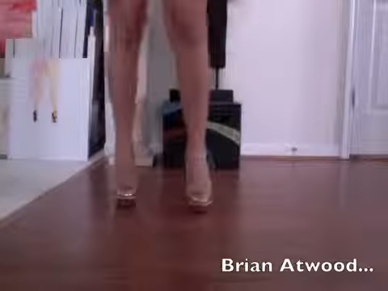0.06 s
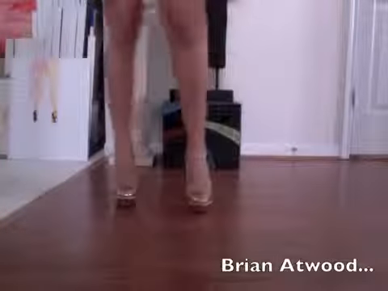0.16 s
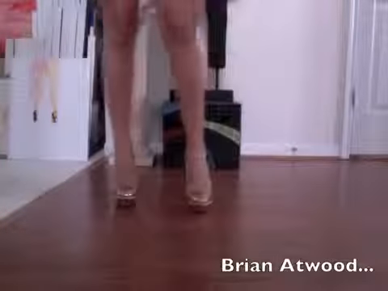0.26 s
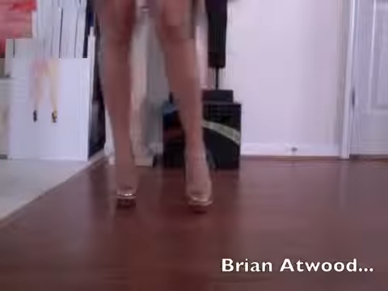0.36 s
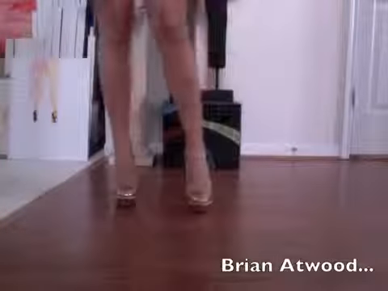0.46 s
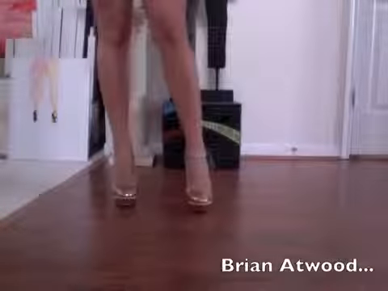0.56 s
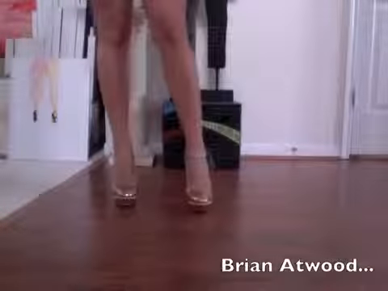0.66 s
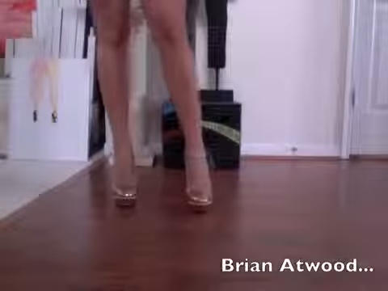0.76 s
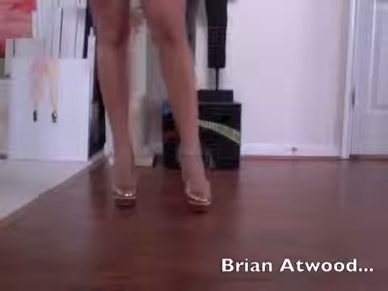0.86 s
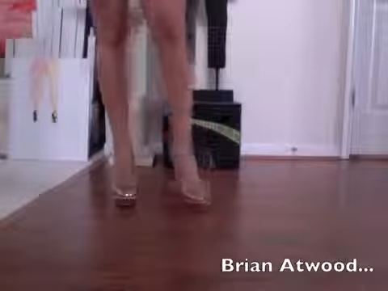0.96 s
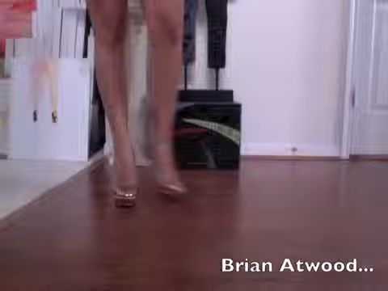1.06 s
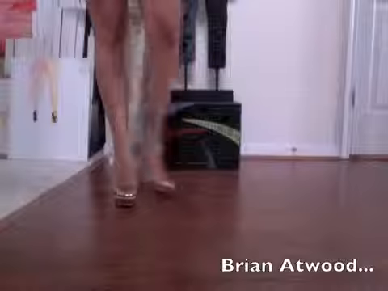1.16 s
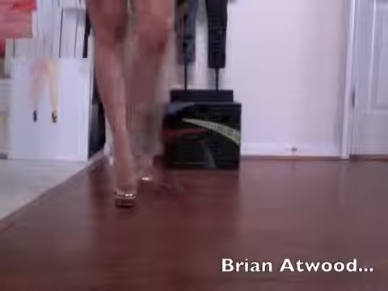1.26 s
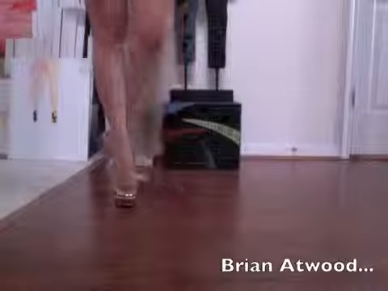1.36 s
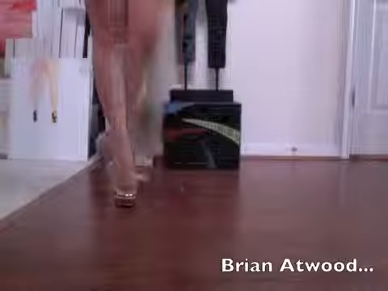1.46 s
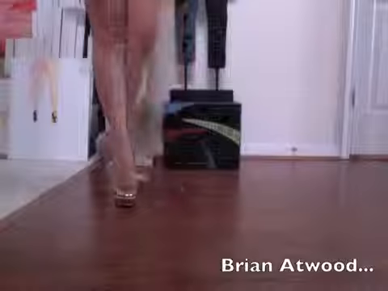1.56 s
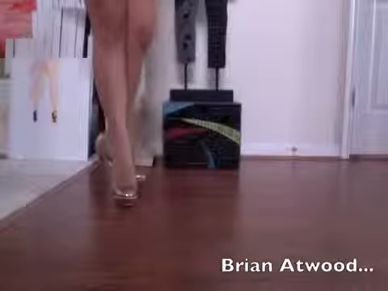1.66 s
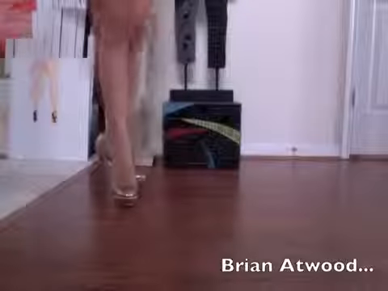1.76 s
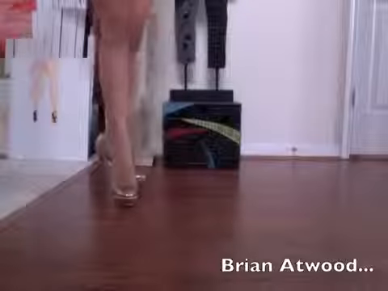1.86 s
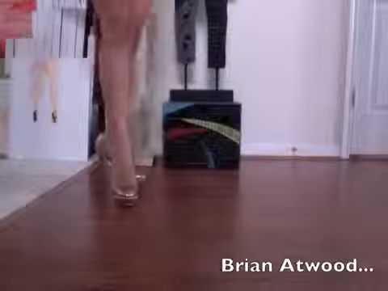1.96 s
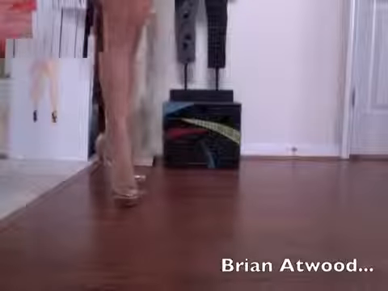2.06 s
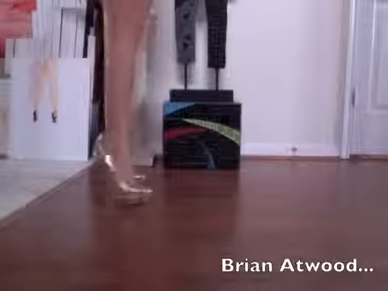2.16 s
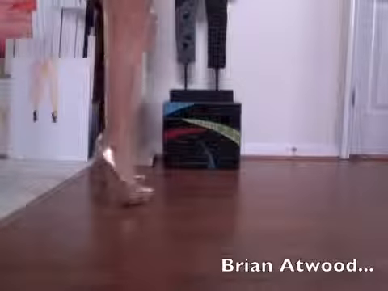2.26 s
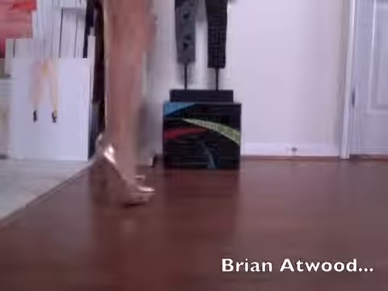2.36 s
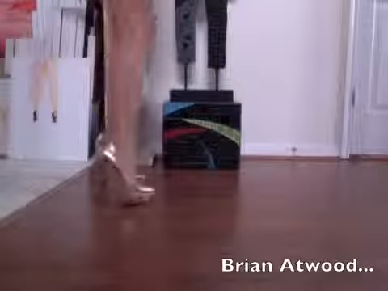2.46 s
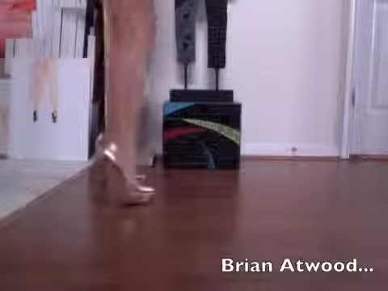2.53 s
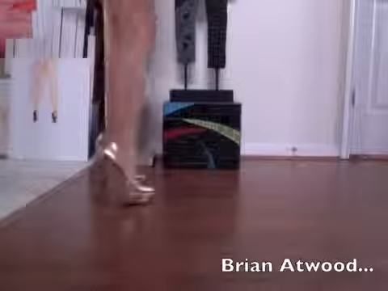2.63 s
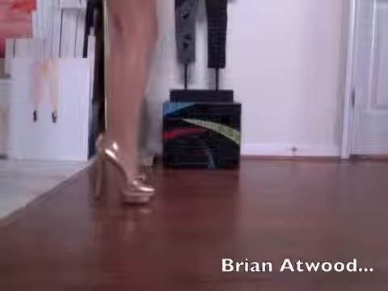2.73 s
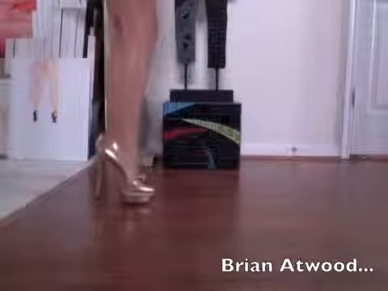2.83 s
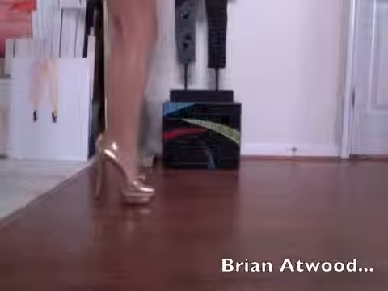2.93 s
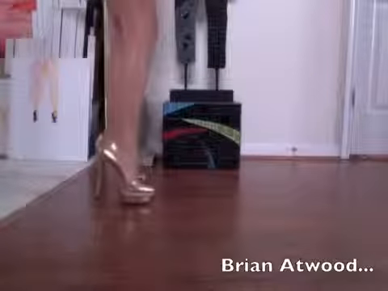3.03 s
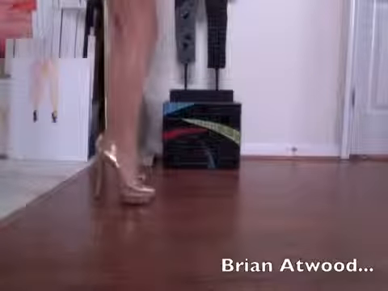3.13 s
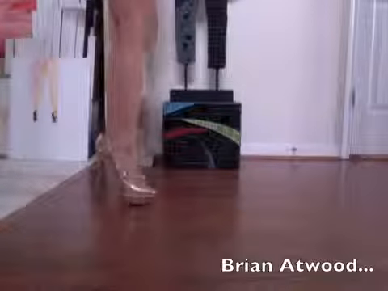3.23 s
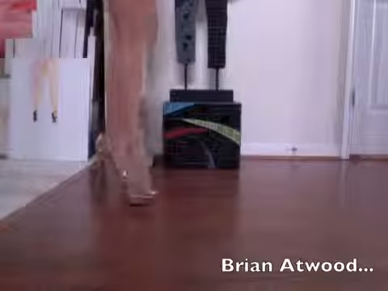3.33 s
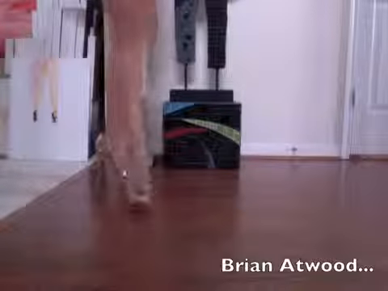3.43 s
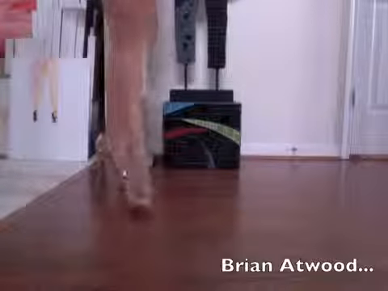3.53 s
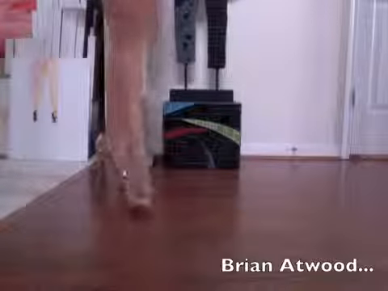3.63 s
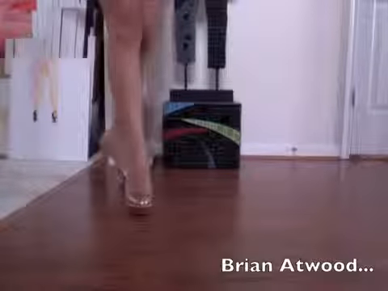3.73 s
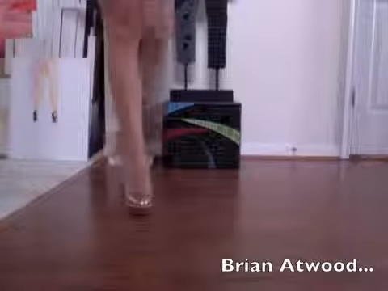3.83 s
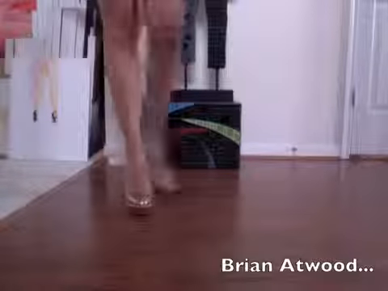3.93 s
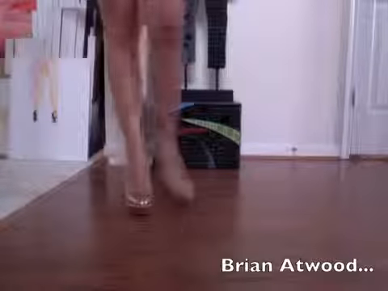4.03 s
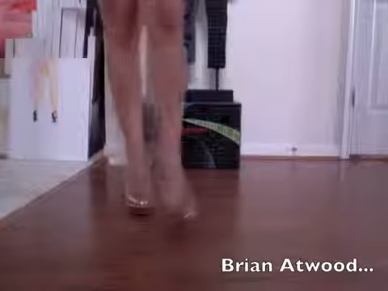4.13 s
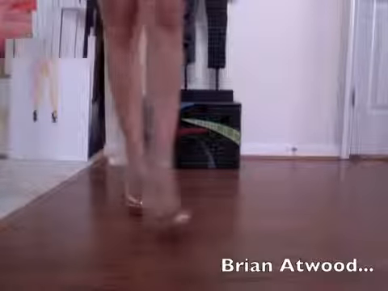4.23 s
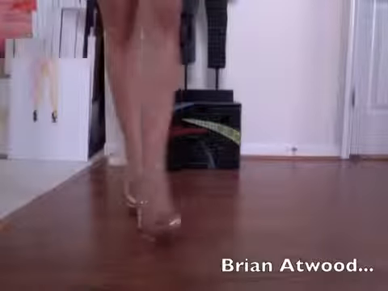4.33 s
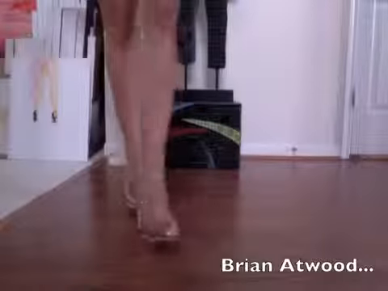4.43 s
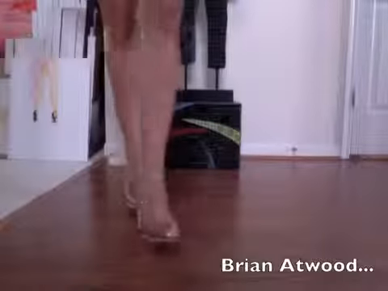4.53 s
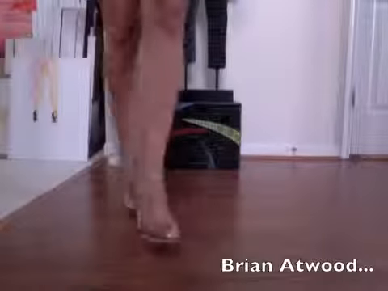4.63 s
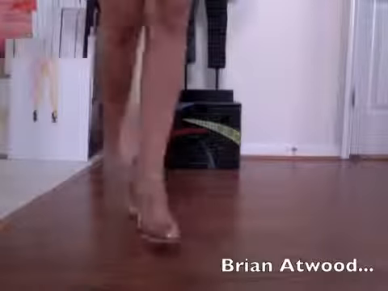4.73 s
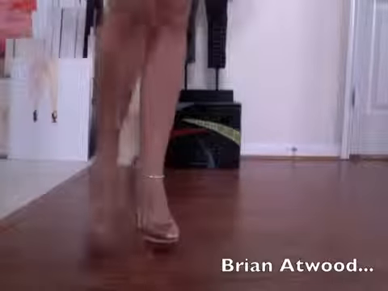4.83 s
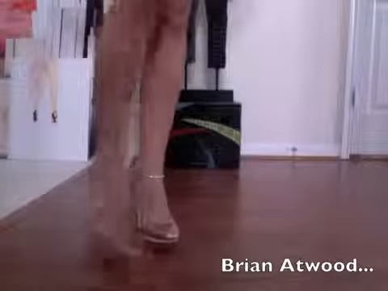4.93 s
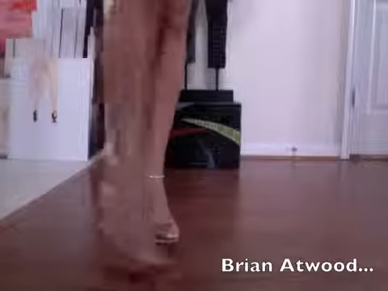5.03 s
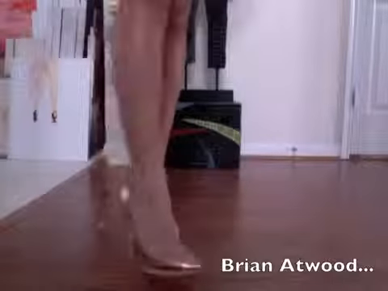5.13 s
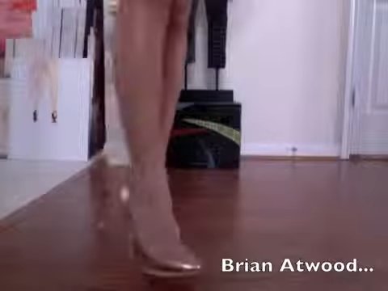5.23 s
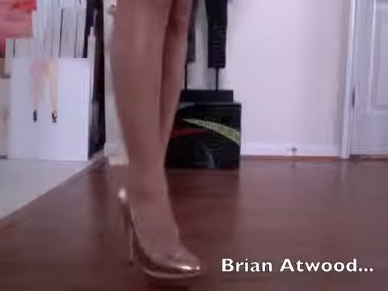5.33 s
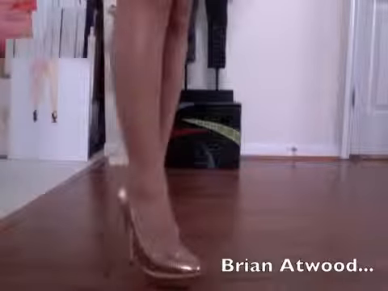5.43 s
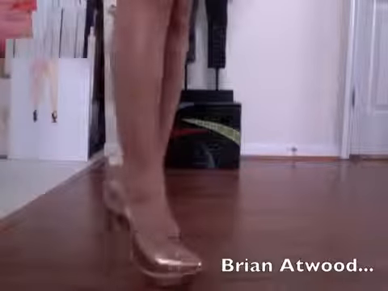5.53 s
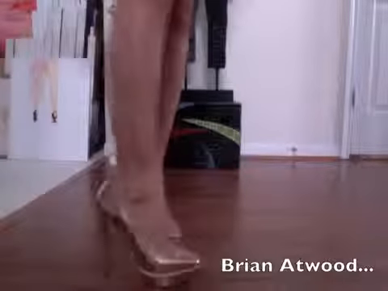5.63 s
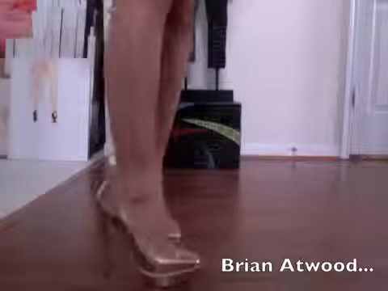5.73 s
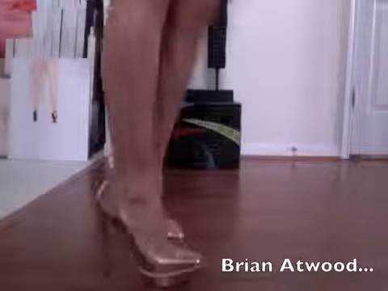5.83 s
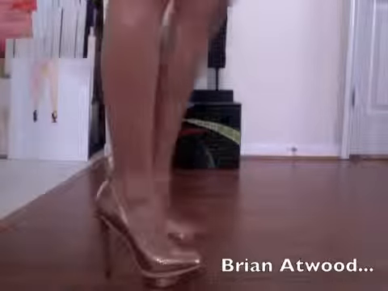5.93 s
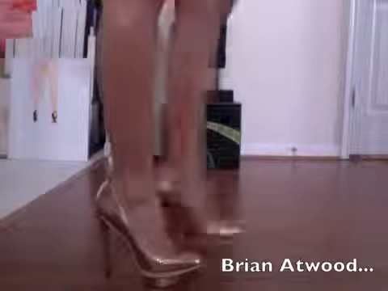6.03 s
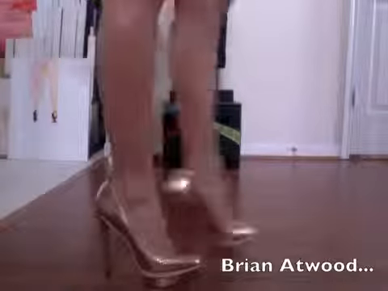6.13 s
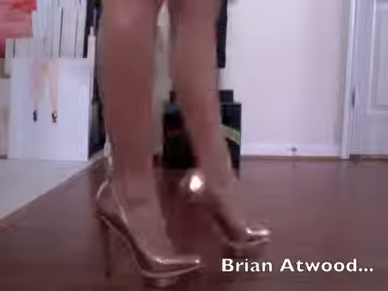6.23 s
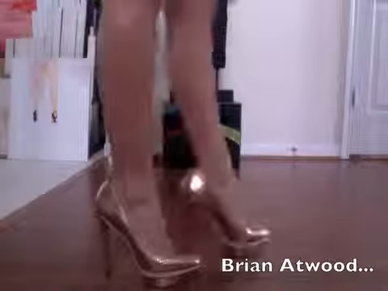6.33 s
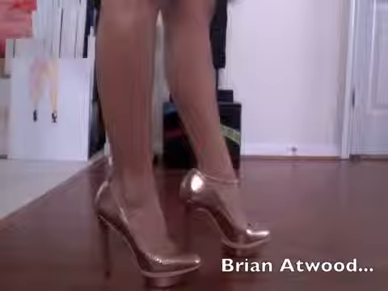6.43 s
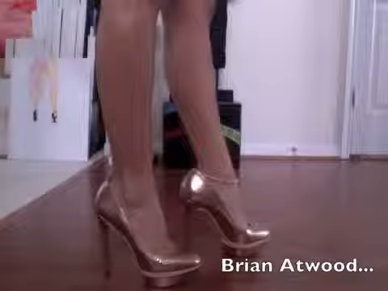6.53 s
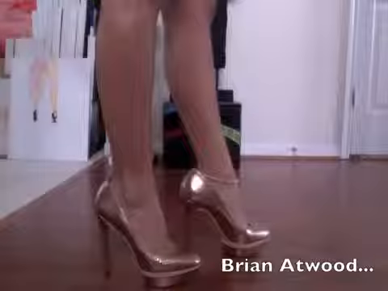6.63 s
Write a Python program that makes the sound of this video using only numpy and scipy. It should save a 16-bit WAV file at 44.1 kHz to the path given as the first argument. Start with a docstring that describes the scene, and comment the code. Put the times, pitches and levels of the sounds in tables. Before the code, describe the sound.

A small, hard indoor room heard near floor level, with little deep bass and a short lively reverberation. Faint air hiss, fan tones, mains hum and a tiny high tick run throughout. At 0 s a hollow platform-shoe knock hits wooden boards with a short scuff, then a click at 0.13. Light clicks and soft brushing come around 0.8-1.0. Knocks at 1.35 and 1.43 lead to a strong one at 1.49; scuffing and a knock at 1.7 follow, then a sharp bright snap at 1.94 and a gritty pivot until 2.2. Sparse small clicks and faint drags fill 2.3-3.4. A double knock lands at 3.47, with light clicks near 3.9-4.3. The loudest knock is at 4.31, another at 4.46, then a rapid juddering scrape until 4.65. Clicks at 4.9, knocks at 5.1-5.2, scuffs and a faint squeak around 5.5, a dull knock at 5.75, a clustered step at 6.2, and faint taps at 6.4.

```python
"""Platform heels on a wooden floor

Platform high heels step, turn and scuff on boards in a small hard room, heard from near the floor.
Knocks are pushes ringing soles and boards; clicks are noise bursts through the resonances of the shoe.
Drags are gritty noise, the judder is a row of slips, and squeaks are narrow bands of noise.
Walls, ceiling and a diffuse tail answer them; air noise, fan tones, mains hum and a faint tick run on.
"""
import sys
import numpy as np
from scipy import signal
from scipy.fft import rfft, irfft, next_fast_len
from scipy.io import wavfile
from scipy.ndimage import map_coordinates

SR = 44100
rng = np.random.default_rng(int(sys.argv[2]) if len(sys.argv) > 2 else 0)


def wav_out(sig):
    """Save sig, one row per channel (or a flat mono array), as 16-bit PCM at SR to the path in sys.argv[1]."""
    wavfile.write(sys.argv[1], SR, np.round(np.clip(np.atleast_2d(sig).T, -1, 1) * 32767).astype(np.int16))


def voltage_ratio(level):
    """Linear amplitude factor for a level in decibels (scalar or array-like)."""
    return 10 ** (np.asarray(level, float) / 20)


N = 294632

# room air, spectral shape only: pitch_hz, relative density_db (per Hz)
AIR_SHAPE = [(20, -48), (45, -50.5), (60, -39.5), (90, -17.5), (150, -14), (250, -18.5), (400, -17.5),
             (640, -21), (920, -12), (1250, -28.5), (1650, -18), (2600, -29.5), (7000, -38.5), (14900, -48)]
AIR_DB = -68  # rms
# fan tones: multiple of the shaft's speed, level_db (rms)
FAN_TONES = [(7, -90), (8, -68.5), (9, -82.5), (11, -78.5), (12, -82.5), (14, -82.5), (15, -85.5),
             (16, -77), (24, -89.5)]
SHAFT_HZ = 24.26
# mains hum: pitch_hz, level_db (rms)
MAINS_TONES = [(59.8, -92), (119.7, -70.5), (239.4, -76)]
TICK_START_S, TICK_GAP_S, TICK_ROUND_S = .1735, .0657, .5608  # first tick, spacing, repeat of a run of eight

# reverberation: pitch_hz, time to die by 60 dB t60_s
ROOM_DECAY = [(100, 0.48), (300, 0.38), (800, 0.44), (2000, 0.47), (5000, 0.39), (12000, 0.12)]
# first answers of near walls and furniture: lag_s, level_db
WALL_ECHOES = [(.0023, -11), (.0041, -14.5), (.0062, -14.5), (.0079, -12.5), (0.0083, -15.5), (0.015, -18),
               (0.0183, -22.5)]
WALL_TOP_HZ = 4360  # they swallow the treble above
# ceiling echo through the scene: start_s, lag_s
CEILING_LAG = [(0, .0125), (4.4, .0125), (5.2, .014), (6.0, .016)]
KNOCK_ECHO_DB, CLICK_ECHO_DB = -13, -6.5  # returns off the ceiling

# resonances of the shoe, for one pass of a filter used two or three times: pitch_hz, width_hz, level_db
SHOE_MODES = [(1848, 1240, -2.5), (4063, 1540, 1), (6380, 2620, -1), (10100, 2000, -1), (13200, 3300, -7.5)]
# resonances of the boards, before any narrowing by ring: pitch_hz, width_hz, level_db
BOARD_MODES = [(147.5, 104, 0), (242, 133, 4.5), (406, 135, -1), (572.6, 100, 4.5), (732, 185, 0),
               (972, 197, -0.5), (1585, 100, -5)]
SOLE_WIDTH = 1.2  # width of the sole's resonance as a multiple of its pitch, at ring 1

# thin squeaks of the shoe's leather: start_s, length_s, pitch_hz, level_db (rms before the fades)
SQUEAKS = [(0.963, 0.027, 13200, -69), (.975, 0.033, 5900, -70), (1.003, .015, 7250, -79),
           (2.064, 0.12, 4250, -66), (4.68, .07, 6260, -64), (5.504, 0.064, 5270, -70),
           (5.52, 0.087, 9420, -77.5), (5.523, 0.059, 11100, -82)]
# shoe clicks whose thin high echo comes back off the ceiling about 11 ms later:
# start_s, click level_db (peak), thin echo level_db (rms before the fades)
ECHOED_CLICKS = [(3.88, -57.5, -76), (3.903, -50.5, -77), (3.922, -48, -77), (4.0527, -44, -67),
                 (4.1056, -46, -70), (4.2098, -50, -71), (4.2648, -50, -78)]
ECHOED_LOW_DB, ECHOED_TREBLE_DB, ECHOED_MS = -3, -20.5, 5.9  # tone and 20 dB decay of the click
THIN_ECHO_LAG_S, THIN_ECHO_S, THIN_ECHO_HZ = .011, 0.0055, 13350

# soles brushing the floor: start_s, strongest_s, end_s, level_db (shoe body), treble_db (hiss over body)
SCUFFS = [(0, -0.003, 0.06, -52.5, -17), (0.142, 0.274, 0.43, -67.5, -19), (0.762, 0.785, 0.89, -69, -34),
          (.83, 0.886, 0.99, -67, -29), (0.951, 0.983, 1.17, -70, -7), (1.549, 1.697, 1.97, -63.5, -16),
          (2.292, 2.33, 2.65, -75.5, -12), (2.63, 2.645, 2.72, -82.5, 13), (3.118, 3.203, 3.24, -72.5, -16),
          (3.385, 3.43, 3.8, -74.5, -11), (3.593, 3.625, 3.86, -67, -23), (3.837, 3.898, 4.09, -71, -9),
          (4.039, 4.06, 4.6, -77.5, -4), (4.89, 4.903, 5.08, -63.5, -3), (5.174, 5.242, 5.27, -69, -9),
          (5.478, 5.581, 5.61, -62.5, -19), (5.64, 5.66, 5.86, -71.5, -20), (5.907, 5.927, 6.01, -77.5, -1)]
# start and end under the strongest moment; boards over the shoe; graininess
SCUFF_ENDS_DB, SCUFF_RUMBLE_DB, GRIT_DB = -15.5, 2.5, 3
# a sole pivoting under the full weight, one list of points a pivot:
# start_s, level_db (shoe body), treble_db (hiss over body), rumble_db (floor over body)
PIVOTS = [
    [(1.955, -65.5, 3.5, -6), (2.0, -63.5, -0.5, 5.5), (2.08, -62, -5, 0.5), (2.19, -62.5, -15, -4.5),
     (2.21, -77, -3, 5), (2.3, -81, -10, 8)],
    [(4.46, -63, -15, -14), (4.5, -61, -7.5, -3), (4.64, -55.5, -6.5, -3), (4.69, -59.5, -23, -1),
     (4.735, -56, -14, -4.5), (4.765, -78, -1, 4.5), (4.88, -71, -10, 4.5)],
]
# a sole judders as it twists under weight:
# start_s, end_s, slips a second, level_db (first slip, before scatter), base treble_db, floor knock_db over level
JUDDER = (4.4955, 4.645, 65.3, -40, -6, 3)
# clicks of the shoes: start_s, level_db (peak), low_db, treble_db, length_ms (to fall 20 dB)
CLICKS = [(0.127, -29.5, 8, -12, 6.6), (0.2912, -56, 34, -28, 3.8), (0.761, -40.5, -9, -72, 2.3),
          (0.7773, -46, -6, -52, 6.3), (0.7994, -42, -3, -56, 3.2), (0.8595, -44, -5, -65, 4.7),
          (0.881, -50, -9, -50, 3), (0.89, -48.5, -9, -51, 1.4), (1.4841, -36, 19.5, -22, 6.7),
          (1.5898, -66, -7, 0, 3), (1.6, -56, -4, 0, 2.4), (1.61, -63, -8, 3, 3),
          (1.6262, -51.5, 13, 11, 2.2), (1.6796, -54, -2, -23, 3.5), (1.701, -43.5, 14, -32, 4.1),
          (1.721, -51.5, -28, -24, 4.8), (1.7574, -48, -19, -19, 11), (1.8253, -53.5, 18, 7, 4.2),
          (1.8724, -52, 11, -2, 3.3), (1.924, -47.5, 8, -17, 4.2), (1.9335, -44, -15, 14, 4.5),
          (1.9439, -23.5, 1.5, -13, 8.7), (1.9491, -36, 7, -16, 7.3), (2.006, -44.5, 12, -15, 4),
          (2.0182, -40, -31, -2, 4), (2.0432, -40.5, -17, -3, 6.1), (2.117, -42, 1, -8, 8.8),
          (2.3147, -49, 8, 0, 5.1), (2.367, -45.5, 4, -10, 4.6), (2.624, -37, 4.5, -7, 5.9),
          (2.883, -55, -4, -22, 3.8), (2.8929, -44.5, 2, 2, 6.8), (3.466, -41, 1.5, -53, 10.4),
          (3.6266, -45, 19, -4, 4.4), (3.645, -48, 21, -3, 5), (4.3088, -36, -5, -67, 7.2),
          (4.7405, -47.5, -31, -9, 2.6), (4.8943, -35, 5.5, -15, 6.8), (4.9, -38.5, -3, -3, 3),
          (4.9373, -35.5, -1, -9, 3.7), (4.9541, -42, -3, -26, 4.7), (4.9644, -42, -12, -5, 2.1),
          (5.1107, -46.5, 3, -29, 10), (5.218, -54, 10, -16, 5.5), (5.445, -57.5, -3, -23, 3),
          (5.5987, -44, -6, -26, 7.1), (5.658, -48, -6, -36, 11), (5.7186, -52, 0, -18, 2.3),
          (5.7477, -52, 16, -25, 2.2), (6.0185, -47, -3.5, -2, 8.1), (6.208, -49, 9.5, -23, 10),
          (6.3868, -46.5, -1, 3, 4), (6.4397, -45.5, -3, 1, 2.8)]
# knocks on the boards: start_s, level_db (peak), pitch_hz of the striking sole,
# ring (1 = usual, larger rings longer), thump_db (joists over boards)
STEPS = [(0.001, -29, 640, 3.6, -41), (0.007, -21, 693, 4.7, -15), (0.02, -26, 554, 1.1, -29),
         (0.125, -38, 740, 1.8, -20), (0.791, -43, 450, 0.37, -30), (0.806, -43.5, 604, 3.4, -29),
         (1.347, -32, 438, 5.5, -5), (1.425, -30, 538, 6.5, -1), (1.485, -16.5, 630, 1.5, -18),
         (1.698, -29.5, 805, 1.3, -19), (1.946, -31, 1010, 3, -26), (2.006, -45, 676, 1.1, -16),
         (3.467, -23, 480, 1.3, -20), (3.474, -26.5, 500, 1.3, -8.5), (3.561, -34, 495, 2.9, -7),
         (3.586, -41, 556, 2.2, -15), (4.307, -12.5, 575, 5, -16.5), (4.32, -33.5, 300, 1, 11.5),
         (4.459, -17, 528, 5.2, -9.5), (4.523, -26.5, 394, 2, -11), (4.537, -30.5, 650, 1.1, -14),
         (4.893, -53, 475, 1.3, -16), (4.935, -47, 404, 6, -8), (5.105, -23.5, 390, 1.26, -8),
         (5.115, -27, 614, 3.4, -13), (5.185, -27, 537, 4.7, -7), (5.294, -50, 560, 2.4, 2),
         (5.446, -41.5, 620, 5.6, -30), (5.569, -44, 487, 5.4, -11), (5.655, -35.5, 820, 3, -14),
         (5.691, -39, 540, 14, -17), (5.746, -23, 557, 0.9, -20), (6.198, -23, 478, 1.6, -9.5),
         (6.207, -22, 533, 1.7, -10), (6.227, -28, 423, 1.54, -9), (6.385, -48.5, 1040, 4.3, -4),
         (6.439, -48, 1000, 2.6, -27)]


def unit(x):
    """Scaled to rms 1."""
    return x / np.sqrt(np.mean(x ** 2) + 1e-20)


def peak(x):
    """Scaled to peak 1."""
    return x / np.abs(x).max()


def along(points, hz):
    """Reads (Hz, value) points on a log frequency axis."""
    f, v = np.transpose(points)
    return np.interp(np.log(hz + 1), np.log(f + 1), v)


def wobble(rate):
    """A smooth random curve, rate knots a second."""
    knots = rng.standard_normal(int(N * rate / SR) + 4)
    return map_coordinates(knots, [np.arange(N) * rate / SR])


def add(track, s, sound):
    """Mixes a short sound into the track at s seconds."""
    part = track[max(round(s * SR), 0):][:len(sound)]
    part += sound[:len(part)]


def filtered(x, response):
    """Shapes x with a complex response of frequency."""
    m = next_fast_len(len(x) + 8192)
    return irfft(rfft(x, m) * response(np.fft.rfftfreq(m, 1 / SR)), m)[:len(x)]


def ringing(modes, extra_db=None, ring=1):
    """Causal resonances of alternating sign, each with some dB added; more ring narrows them."""
    extra_db = np.zeros(len(modes)) if extra_db is None else extra_db

    def response(f):
        total = 0
        for k, ((hz, width, db), extra) in enumerate(zip(modes, extra_db)):
            damping = 1j * f * width
            mode = damping / (ring * (hz * hz - f * f) + damping)
            total = total + (-1) ** k * voltage_ratio(db + extra) * mode
        return total

    return response


def shoe(low_db, treble_db, top_db=0.0):
    """The shoe's resonances, steep-sided; the lowest and the upper ones raised or lowered."""
    tilt_db = np.array([low_db, 0, treble_db * 0.65, treble_db, treble_db + top_db])
    once = ringing(SHOE_MODES, tilt_db / 3)
    return lambda f: once(f) ** 3


def sole(hz, ring=1):
    """The resonance of the thick sole or heel; more ring narrows it."""
    return ringing([(hz, SOLE_WIDTH * hz, 0)], ring=ring)


def hum():
    """Air noise, fan blade tones on the shaft's multiples and mains buzz, slightly unsteady."""
    t = np.arange(N) / SR
    hiss = unit(filtered(rng.standard_normal(N), lambda hz: voltage_ratio(along(AIR_SHAPE, hz))))
    air = voltage_ratio(AIR_DB + 0.17 * wobble(2.5)) * hiss
    turns = np.cumsum(SHAFT_HZ * (1 + 0.0011 * wobble(1.4))) / SR
    tones = np.zeros(N)
    for k, db in FAN_TONES:
        tones += voltage_ratio(db + 1.5 * wobble(4)) * np.sin(2 * np.pi * (k * turns + rng.random()))
    for hz, db in MAINS_TONES:
        tones += voltage_ratio(db + 0.2 * wobble(1)) * np.sin(2 * np.pi * (hz * t + rng.random()))
    return air + np.sqrt(2) * tones  # rms to peak


def ticks():
    """A faint high tick in runs of eight: short swelling and dying sines, left without any room."""
    out, t = np.zeros(N), np.arange(512) / SR
    rounds_s = TICK_ROUND_S * np.arange(12)[:, None]
    for s in (TICK_START_S + rounds_s + TICK_GAP_S * np.arange(8)).ravel():
        late, size, pitch, length = rng.standard_normal(4)
        u = t / (.0013 * np.exp(.45 * length))
        gain = voltage_ratio(-68.5 + 6.2 * size)
        tone = np.sin(2 * np.pi * 8850 * (1 + .012 * pitch) * t)
        add(out, s + 0.0054 * late, gain * u * np.exp(-u) * tone)
    return out


def ceiling(s):
    """When a sound made at s comes back off the ceiling."""
    return s + np.interp(s, *np.transpose(CEILING_LAG))


def walls(x):
    """Weak, dull early copies off near surfaces."""
    out = np.zeros(N)
    for lag_s, db in WALL_ECHOES:
        add(out, lag_s, voltage_ratio(db) * x)
    return filtered(out, lambda hz: (WALL_TOP_HZ / (WALL_TOP_HZ + 1j * hz)) ** 2)


def room(x):
    """A diffuse tail, drawn anew every eighth of a second; each frequency dies at its own speed."""
    out, hop = np.zeros(N), SR // 8
    for start in range(0, N, hop):
        hz, t, z = signal.stft(rng.standard_normal(SR // 2), SR, nperseg=256)
        decay = voltage_ratio(-60 * t / along(ROOM_DECAY, hz)[:, None])
        tail = signal.istft(z * decay, SR, nperseg=256)[1]
        tail = tail / np.linalg.norm(tail)
        add(out, start / SR + 0.0029, signal.fftconvolve(x[start:start + hop], tail))
    return out


def squeaks():
    """Leather squeaks and thin high click echoes: narrow bands of noise that swell and fade."""
    out = np.zeros(N)
    thin_echoes = [(s + THIN_ECHO_LAG_S, THIN_ECHO_S, THIN_ECHO_HZ, db) for s, _, db in ECHOED_CLICKS]
    for s, length, hz, db in SQUEAKS + thin_echoes:
        band = ringing([(hz, 500, 0)])
        noise = rng.standard_normal(round(length * SR))
        noise = unit(filtered(noise, lambda f: band(f) ** 2))
        add(out, s, voltage_ratio(db) * signal.windows.tukey(len(noise), .5) * noise)
    return out


def drags():
    """A sole rubs the varnish in gritty grains, and rumbles in the boards."""
    out, t = np.zeros(N), np.arange(N) / SR
    grains = unit(wobble(70) + 1.3 * wobble(250) + 0.62 * wobble(900))
    strokes = []
    for start, top, end, db, treble_db in SCUFFS:
        points = [(start, SCUFF_ENDS_DB), (top, 0), (end, SCUFF_ENDS_DB)]
        strokes.append([(s, db + under_db, treble_db, SCUFF_RUMBLE_DB) for s, under_db in points])
    upper = ringing(SHOE_MODES[2:])
    for rows in strokes + PIVOTS:
        s, db, treble_db, rumble_db = np.transpose(rows)
        part = slice(max(round(s[0] * SR), 0), round(s[-1] * SR))
        now = t[part]
        rub = rng.standard_normal(len(now)) * voltage_ratio(GRIT_DB * grains[part])
        body = unit(filtered(rub, shoe(0, -13.5)))
        hiss = unit(filtered(filtered(rub, upper), upper))
        wood = unit(filtered(filtered(rub, sole(896)), ringing(BOARD_MODES)))
        mix = body + voltage_ratio(np.interp(now, s, treble_db)) * hiss + voltage_ratio(np.interp(now, s, rumble_db)) * wood
        out[part] += voltage_ratio(np.interp(now, s, db)) * signal.windows.tukey(len(now), .12) * mix
    return out


def snap(ms, low_db, treble_db, top_db=0.0):
    """A burst of noise falling 20 dB in ms, through the shoe; peak 1."""
    t = np.arange(2048) / SR
    burst = rng.standard_normal(len(t)) * voltage_ratio(-20 * t / (max(ms, .3) / 1000))
    return peak(filtered(burst, shoe(low_db, treble_db, top_db)))


def knock(hz, ring, thump_db):
    """One push of the sole on the boards, which answer a little differently at every spot; peak 1."""
    u = np.arange(8192) / SR * hz / 0.41  # a higher sole stays in contact more briefly
    push = np.sin(np.pi * np.minimum(u, 1)) ** 2
    spot_db = rng.normal(0, 1.5, len(BOARD_MODES))
    boards = ringing(BOARD_MODES[2:], spot_db[2:], 0.89)
    rung = filtered(filtered(push, sole(hz, max(ring, .3))), boards)
    # the weight of the foot moves the joists directly
    joists = ringing(BOARD_MODES[:2], spot_db[:2], 1.92)
    thump = filtered(filtered(push, sole(224)), joists)
    return peak(peak(rung) + voltage_ratio(thump_db) * peak(thump))


def judder():
    """Nearly even slips: a bright snap, the shoe's body just before it, a small knock in the boards."""
    start, end, rate, db, treble_db, knock_db = JUDDER
    out = np.zeros(N)
    for s in np.arange(start, end, 1 / rate):
        late, size = rng.standard_normal(2)
        fade_db = db + 0.42 * size - 25 * (s - start)  # weakens slip by slip
        add(out, s + 0.00016 * late, voltage_ratio(fade_db - 5.0) * snap(1.2, -18, treble_db + 35))
        add(out, s - .003, voltage_ratio(fade_db) * snap(1.0, -15, treble_db - 19))
        add(out, s - .003, voltage_ratio(fade_db + knock_db) * knock(790, 0.56, -17))
    return out


def clicks():
    """The shoes snap briefly; the treble, beamed upwards, returns stronger off the ceiling."""
    out = np.zeros(N)
    echoed = [(s, db, ECHOED_LOW_DB, ECHOED_TREBLE_DB, ECHOED_MS) for s, db, _ in ECHOED_CLICKS]
    for s, db, low_db, treble_db, ms in CLICKS + echoed:
        add(out, s, voltage_ratio(db) * snap(ms, low_db, treble_db))
        echo = snap(ms, low_db - 7.5, treble_db + 9.5, top_db=5)
        add(out, ceiling(s), voltage_ratio(db + CLICK_ECHO_DB) * echo)
    return out


def steps():
    """Soles and heels knock the boards, and each knock returns off the ceiling."""
    out = np.zeros(N)
    for s, db, hz, ring, thump_db in STEPS:
        sound = knock(hz, ring, thump_db)
        add(out, s, voltage_ratio(db) * sound)
        add(out, ceiling(s), voltage_ratio(db + KNOCK_ECHO_DB) * sound)
    return out


def scene():
    """Shoes in the room over the steady sounds."""
    knocks = steps()
    rustle = clicks() + drags() + judder() + squeaks()
    tail = room(voltage_ratio(-9.0) * knocks + voltage_ratio(-9.5) * rustle)
    shoes = knocks + rustle + walls(rustle) + tail
    # little bass reaches the small microphone
    shoes = filtered(shoes, lambda hz: (1j * hz / (90 + 1j * hz)) ** 2)
    return (shoes + hum() + ticks())[None]


def roll_off(x):
    """The treble ends steeply here."""
    return signal.sosfilt(signal.butter(12, 15070, fs=SR, output="sos"), x)


def record(dry):
    """Delivers the finished mix."""
    return roll_off(dry)


dry = scene()
out = record(dry)
wav_out(out)
```